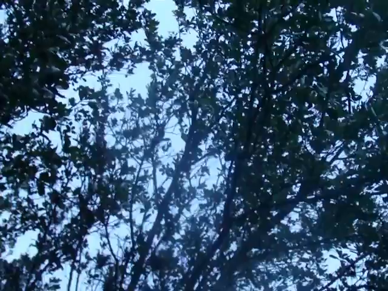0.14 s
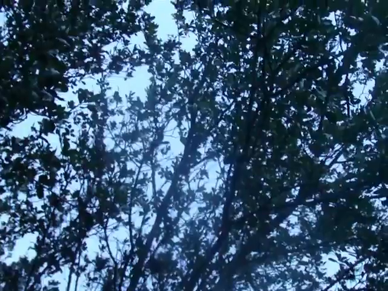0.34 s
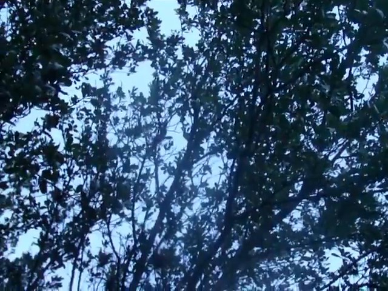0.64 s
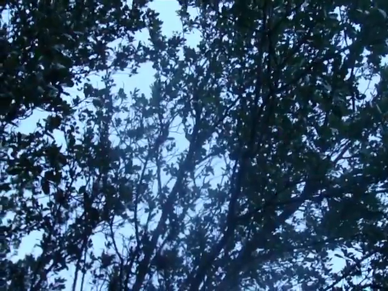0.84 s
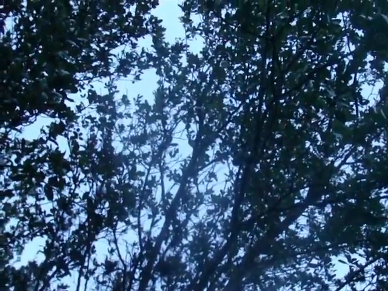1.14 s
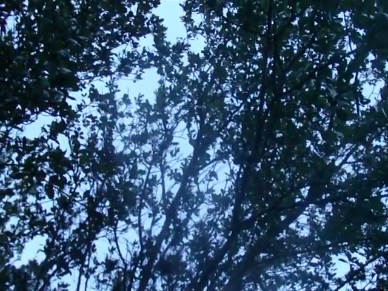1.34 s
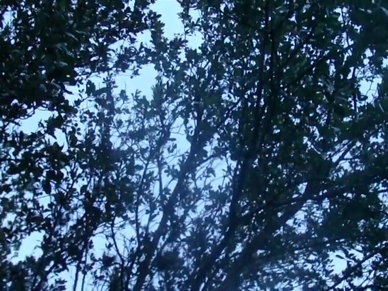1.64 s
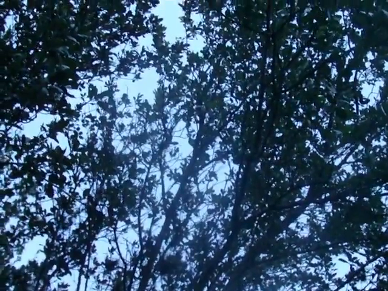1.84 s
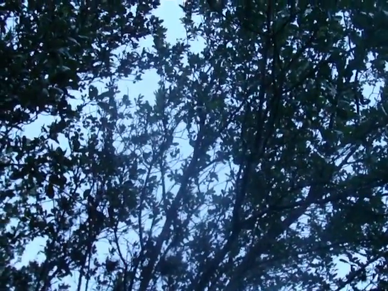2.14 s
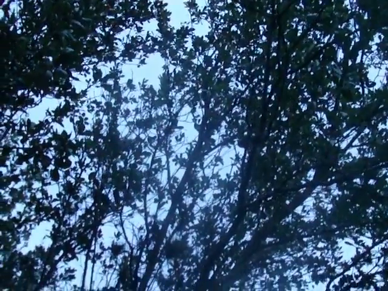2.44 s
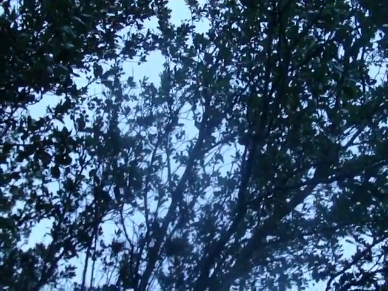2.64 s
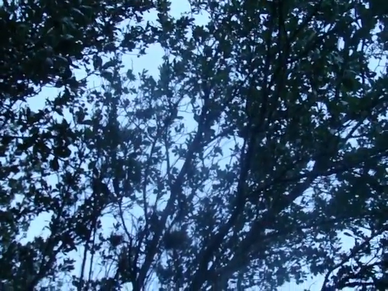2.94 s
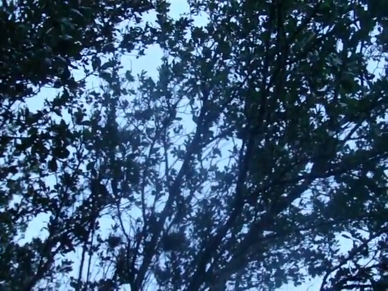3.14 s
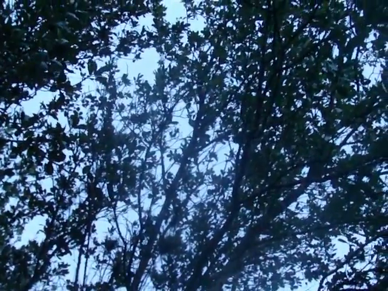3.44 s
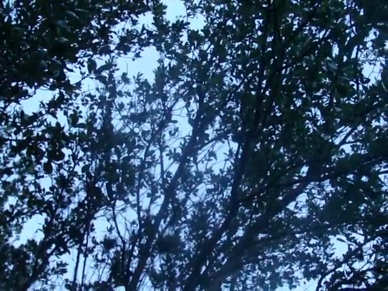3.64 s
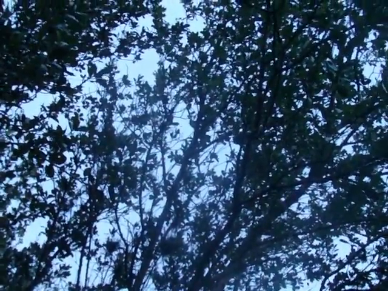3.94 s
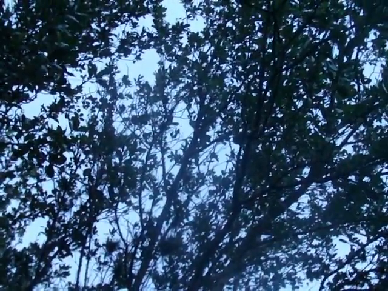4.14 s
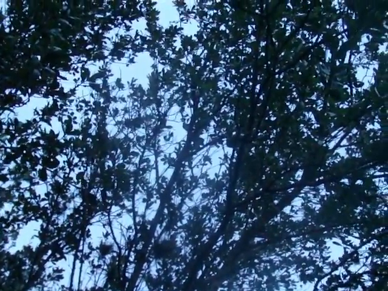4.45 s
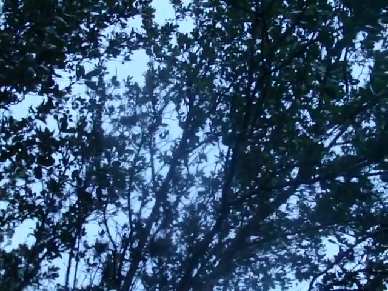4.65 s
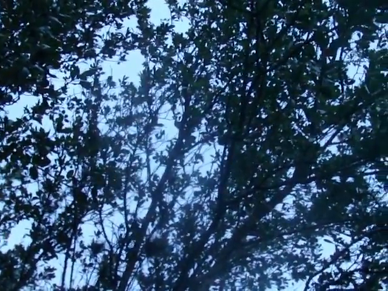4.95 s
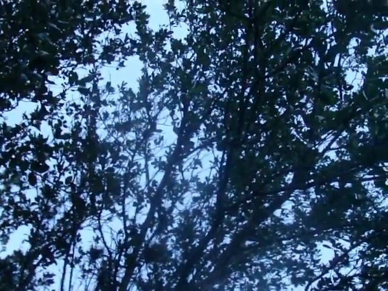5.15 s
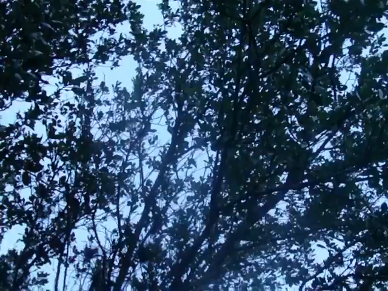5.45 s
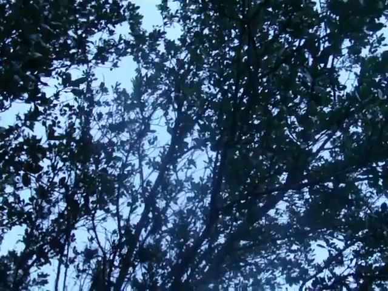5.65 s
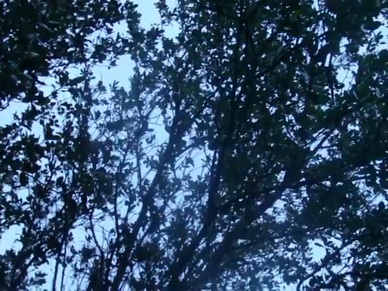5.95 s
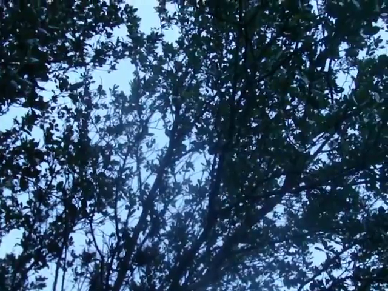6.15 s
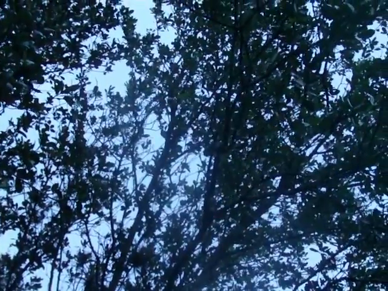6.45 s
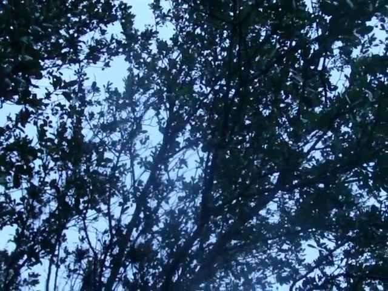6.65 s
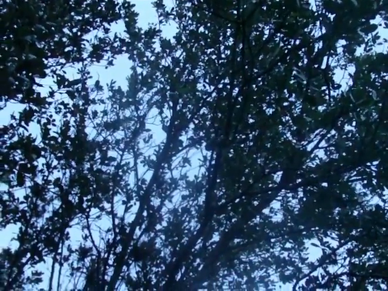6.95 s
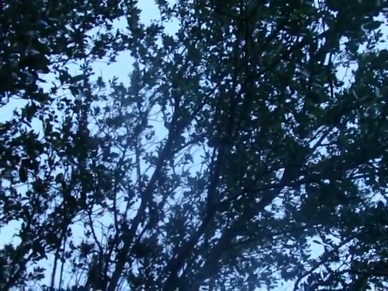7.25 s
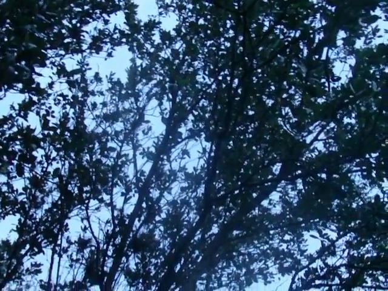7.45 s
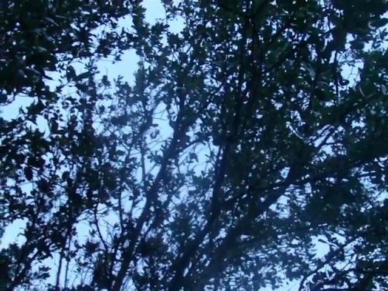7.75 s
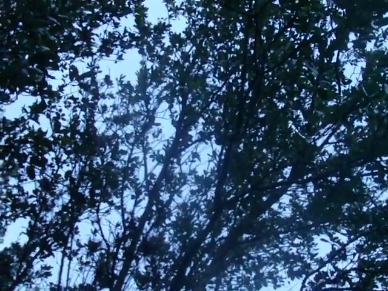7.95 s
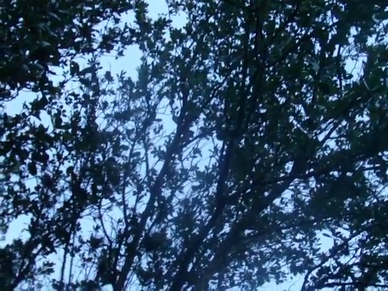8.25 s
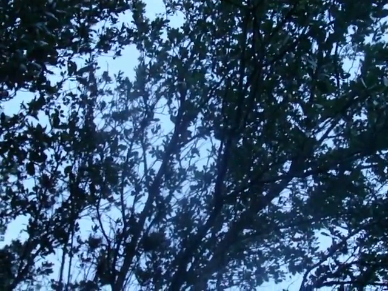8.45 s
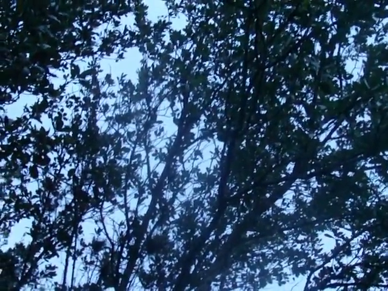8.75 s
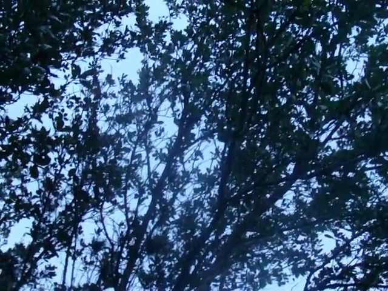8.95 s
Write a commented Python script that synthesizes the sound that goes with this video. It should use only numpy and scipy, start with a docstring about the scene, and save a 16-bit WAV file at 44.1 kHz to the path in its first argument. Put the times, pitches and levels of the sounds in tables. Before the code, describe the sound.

From 0 to about 9 seconds a single cicada sings loudly and without stopping in a tree. Its voice is a harsh, dry, metallic buzz made of some two hundred tiny falling clicks a second, strongest around 3 to 5 kHz, with a hollow wavering note near 3 kHz. Roughly six times a second it catches for a hundredth of a second, giving a quick, slightly uneven pulsing; leaves and the grove blur these gaps with a short airy tail. Above it, distant insects sustain a thin shrill hiss around 8 to 9 kHz, with fainter overtones; from about 2.6 seconds it grows a little stronger as a fast blurred clicking joins, then slowly fades. Far beneath, a vehicle approaches on a road, its hum, rumble and soft tyre hiss fullest around 5 to 6 seconds, then recedes with slightly lowering pitch. Faint steady low outdoor noise continues throughout, in mono.

```python
"""A cicada drones in a tree: its two tymbals buckle in turn, each stroke a falling chirp of a few milliseconds,
over a sustained abdomen note, with a brief catch about six times a second. Leaves scatter the song.
Further off, higher-pitched insects shrill as filtered noise and a blurred click train, and a motor vehicle
passes faintly on a road: engine harmonics, rumble and tyre hiss. Steady coloured noise lies behind it all."""
import sys
import numpy as np
from scipy import signal
from scipy.fft import rfft, irfft, next_fast_len
from scipy.io import wavfile
from scipy.ndimage import uniform_filter1d

SR = 44100
rng = np.random.default_rng(int(sys.argv[2]) if len(sys.argv) > 2 else 0)


def unload_audio(sound):
    """Save the sound as a 16-bit wav file, at the path given as the first command line argument."""
    columns = np.transpose(np.atleast_2d(sound))
    # keep every value between -1 and 1, then stretch to whole-number steps
    steps = np.round(np.clip(columns, -1, 1) * 32767)
    wavfile.write(sys.argv[1], SR, steps.astype(np.int16))


N = 401310
TIME = np.arange(N) / SR  # s


def undb(db):
    """Decibels to gain."""
    return 10 ** (np.asarray(db) / 20)


def unit(x):
    """Scale to rms 1."""
    return x / np.sqrt(np.mean(x ** 2))


def curves(table):
    """Each column of a (time [s], ..) table, drawn as straight lines over every sample."""
    s, *columns = np.transpose(table)
    return [np.interp(TIME, s, column) for column in columns]


def walk(rate):
    """Smooth random drift with about `rate` turns a second and rms 1."""
    hold = max(int(SR / rate), 1)
    steps = np.repeat(rng.standard_normal(N // hold + 1), hold)
    return unit(uniform_filter1d(steps, hold)[:N])


def colour(x, points):
    """Filter by a (frequency [Hz], level [dB]) outline, to rms 1."""
    hz, db = np.transpose(points)
    size = next_fast_len(N + 4096)
    f = np.maximum(np.fft.rfftfreq(size, 1 / SR), 1)
    octaves_outside = np.abs(np.log2(f / np.clip(f, hz[0], hz[-1])))
    outline_db = np.interp(np.log(f), np.log(hz), db) - 24 * octaves_outside
    return unit(irfft(rfft(x, size) * undb(outline_db), size)[:N])


def resonate(x, hz, width_hz):
    """One resonance, gain 1 at its centre."""
    return signal.lfilter(*signal.iirpeak(hz, hz / width_hz, fs=SR), x)


def scatter(x, t60):
    """Countless small echoes as a noise tail that falls 60 dB in t60 seconds; rms 1."""
    t = TIME[:SR // 2]
    echoes = rng.standard_normal(len(t)) * np.exp(-np.log(1000) * t / t60)
    return unit(signal.fftconvolve(x, echoes)[:N])


# spectrum of the steady far-off background: (frequency [Hz], relative level [dB])
AIR_SPECTRUM = [(30, 16), (120, 5), (300, 1), (500, -6), (1000, -10), (2000, -9)]


def far_background(level_db=-49):
    """Steady noise, weighted to the lows."""
    return colour(rng.standard_normal(N), AIR_SPECTRUM) * undb(level_db)


# low drone and exhaust harmonics, as loud as at the road's distance:
# (multiple of the cycle rate [1], level ahead [dB], level beside [dB], level behind [dB])
ENGINE_HARMONICS = [(3.11, -35, -34, -44.5), (5, -28.5, -35, -31.5), (10, -31, -48, -28),
                    (12, -46, -42.5, -46), (15, -48.5, -42, -55), (20, -61, -60, -45)]
# spectra of the road rumble and the tyre hiss: (frequency [Hz], relative level [dB])
RUMBLE_SPECTRUM = [(15, -2), (35, -4), (60, -1), (120, 0.5), (220, -4), (320, -11), (500, -21), (900, -33)]
TYRE_SPECTRUM = [(250, -16.5), (550, -10.5), (850, 0), (1200, 0), (1800, -5.5), (2600, -6), (6000, -37.5)]
# swell of the tyre hiss, before its trim and flutter: (time [s], level [dB])
TYRE_SWELL = [(0.0, -46), (0.05, -49), (0.99, -48), (1.39, -49.5), (2.28, -45.5), (2.84, -42), (4.31, -44),
              (5.12, -38.5), (8.01, -44), (8.49, -41), (8.85, -44), (9.1, -43.5)]
# the pass: when it is nearest, its speed, how far off the road is, its engine's cycle rate
NEAREST_S, SPEED_M_S, ROAD_M, CYCLE_HZ = 5.76, 31.7, 49.2, 16.42
SOUND_M_S = 343
# trees in between dull the engine: loss per metre beyond the road's distance and per Hz
TREES_DB_PER_M_HZ = .0003


def vehicle(rumble_db=-35, tyres_trim_db=1.5, waver_db=1.13):
    """Engine harmonics swell and, by Doppler shift, sink in pitch as it passes, over rumble and tyre hiss."""
    along = SPEED_M_S * (TIME - NEAREST_S)
    distance = np.hypot(along, ROAD_M)
    away = along / distance  # -1 coming, 0 abreast, 1 going
    hz = CYCLE_HZ / (1 + away * SPEED_M_S / SOUND_M_S)
    phase = 2 * np.pi * np.cumsum(hz * (1 + 0.002 * walk(15))) / SR
    loss_db = TREES_DB_PER_M_HZ * (distance - ROAD_M) * hz
    engine = np.zeros(N)
    for multiple, *heard_db in ENGINE_HARMONICS:
        tone_db = np.interp(away, [-1, 0, 1], heard_db) - multiple * loss_db + waver_db * walk(4.9)
        engine += np.sqrt(2) * np.sin(multiple * phase) * undb(tone_db)
    rumble = colour(rng.standard_normal(N), RUMBLE_SPECTRUM) * undb(rumble_db)
    hiss_db, = curves(TYRE_SWELL)
    tyres = colour(rng.standard_normal(N), TYRE_SPECTRUM) * undb(hiss_db + tyres_trim_db + 0.53 * walk(8))
    return (engine + rumble) * ROAD_M / distance + tyres


# main resonance and overtone band of the higher-pitched insects: (frequency [Hz], relative level [dB])
SHRILL_SPECTRUM = [(5500, -10), (6800, -17.5), (7600, -15.5), (8100, -2), (8600, -0.5), (9200, 1),
                   (9800, -8), (10600, -17), (12000, -24)]
OVERTONE_SPECTRUM = [(8500, -9), (10500, -3.5), (11300, -3), (12000, 0.5), (13500, 0.5), (14200, -9),
                     (15000, -20.5)]
# their swell, the overtones before a trim: (time [s], main band level [dB], overtone band level [dB])
SHRILL_SWELL = [(0.0, -24, -34.5), (0.35, -25.5, -37), (0.73, -26, -35.5), (1.77, -26.5, -36),
                (1.9, -26, -35), (3.06, -22, -34), (4.36, -22.5, -33), (8.72, -24, -34), (9.1, -25, -34)]
# the clicking insect swells up to its peak, then slowly fades; peak level against the chorus
CLICKER_PEAK_S, CLICKER_DB, CLICKER_RISE_DB_PER_S, CLICKER_FADE_DB_PER_S = 2.695, -1, 38, 1.5


def shrill_insects(click_hz=368, overtone_trim_db=-2):
    """A far chorus blurred to a hiss; one nearer insect joins with a fast, wavering click train."""
    main_db, overtone_db = curves(SHRILL_SWELL)
    since = TIME - CLICKER_PEAK_S
    swell_db = np.minimum(CLICKER_RISE_DB_PER_S * since, -CLICKER_FADE_DB_PER_S * since)
    share = undb(CLICKER_DB + swell_db)
    rate = click_hz * (1 + .003 * walk(2) + .003 * walk(150))
    clicks = np.diff(np.floor(np.cumsum(rate) / SR), prepend=0)  # one click per whole cycle
    chorus = rng.standard_normal(N) * undb(0.47 * walk(250))
    # the clicker takes its share without raising the overall power
    source = (chorus + share * scatter(clicks, t60=0.025)) / np.hypot(1, share)
    main = colour(source, SHRILL_SPECTRUM) * undb(main_db)
    overtones = colour(source, OVERTONE_SPECTRUM) * undb(overtone_db + overtone_trim_db)
    return main + overtones


# pace of the song, in runs of even phrases: (time of the catch opening the run [s], phrases in the run [count])
PHRASE_RUNS = [(0.1064, 3), (0.552, 7), (1.6491, 2), (1.9533, 2), (2.2697, 1), (2.4196, 11), (4.165, 2),
               (4.492, 1), (4.6383, 9), (6.1185, 3), (6.5909, 3), (7.0819, 4), (7.7624, 2), (8.089, 3),
               (8.5933, 3), (9.0786, 1)]
# a catch lasts a little longer as the song goes on; spread as a share of its length
CATCH_S, CATCH_GROWTH_S_PER_S, CATCH_SPREAD = .0109, .0002, .1


def catches():
    """Start and end (s) of each brief catch between two phrases."""
    opens, phrases = np.transpose(PHRASE_RUNS)
    first_number = np.cumsum(phrases) - phrases
    middle = np.interp(np.arange(first_number[-1] + 1), first_number, opens)
    length = CATCH_S + CATCH_GROWTH_S_PER_S * middle
    length = length * (1 + CATCH_SPREAD * rng.standard_normal(len(middle)))
    return middle - length / 2, middle + length / 2


# stroke spacing after a catch, before each phrase is stretched to fit: (time since the catch [s], spacing [s])
STROKE_SPACING = [(0, 0.0044), (.012, 0.00492), (.019, .0051), (.04, .0047), (.1, .00455), (.15, .0041)]


def stroke_times(limp=.025, jitter=.014, last_stroke_s=.0029):
    """Rows (s, tymbal 0 or 1, strokes to the nearer end of the phrase): left and right alternate unevenly."""
    pause, resume = catches()
    starts = np.append(-.04, resume)
    ends = np.append(pause, TIME[-1] + .1)
    rows = []
    for start, end in zip(starts, ends):
        chance = rng.standard_normal(64)
        span = end - start - last_stroke_s
        t = [0.]
        while t[-1] < span:
            k = len(t)
            spacing = np.interp(t[-1], *np.transpose(STROKE_SPACING))
            t.append(t[-1] + spacing * (1 + limp * (-1) ** k + jitter * chance[k % len(chance)]))
        # stretch the phrase so that its last stroke lands on the span
        last = np.argmin(np.abs(np.array(t) - span))
        rows += [(start + t[k] * span / t[last], k % 2, min(k, last - k)) for k in range(last + 1)]
    return np.array(rows)


# one stroke, the ribs buckling from stiff to slack in two bursts, before each stroke's own variation:
# (time in the stroke [s], pitch [Hz], level [dB])
STROKE_SHAPE = [(0, 5600, -23), (.00026, 5330, 1.5), (.00075, 4980, 4), (.0013, 4700, -6.5),
                (.0019, 4370, 2), (.0028, 4090, 0.5), (.0034, 3700, -9), (.004, 3250, -10.5),
                (.0052, 2960, -19), (.007, 2960, -66)]


def tymbals(rib_hz=1250, rib_depth=0.5, pitch_spread=0.022, side_detune=0.013, size_db=.4, rasp=0.14, edge_db=-2):
    """Every stroke is a falling chirp that flutters as rib after rib gives way; those beside a catch are weaker."""
    start, side, from_edge = stroke_times().T[:, :, None]
    pitch_chance, rib_chance, phase_chance, size_chance = rng.standard_normal((4, len(start), 1))
    at, pitch_hz, stroke_db = np.transpose(STROKE_SHAPE)
    t = TIME[:int(at[-1] * SR)]
    hz = np.interp(t, at, pitch_hz) * (1 + pitch_spread * pitch_chance + side_detune * (side - .5))
    rib_phase = 2 * np.pi * rib_hz * t * (1 + 0.09 * rib_chance) + np.pi * side + phase_chance
    ribs = 1 + rib_depth * np.cos(rib_phase)
    chirp = np.sin(2 * np.pi * np.cumsum(hz, axis=1) / SR)
    wave = chirp + rasp * rng.standard_normal(hz.shape)
    level_db = np.interp(t, at, stroke_db) + size_db * size_chance + edge_db * (from_edge == 0)
    strokes = wave * ribs * undb(level_db)
    # lay all strokes on the timeline, summing where they overlap
    index = (start * SR).astype(int) + np.arange(len(t))
    inside = (index >= 0) & (index < N)
    return np.bincount(index[inside], strokes[inside], N)


def abdomen_note(strokes, note_hz=3053, waver=.017, waver_hz=90, follow_s=0.00469, level_db=-13.5):
    """The strokes keep the hollow abdomen singing on one wavering note, which stops in each catch."""
    drive = uniform_filter1d(np.abs(strokes), max(int(follow_s * SR), 1))
    hz = note_hz * (1 + waver * walk(waver_hz))
    note = drive * np.sin(2 * np.pi * np.cumsum(hz) / SR)
    return unit(note) * undb(level_db)  # against the radiated strokes


# resonances and hollows of the abdomen and tymbal covers: (frequency [Hz], width [Hz], boost [dB])
BODY_RESONANCES = [(3032, 89, 7.5), (3640, 46.3, 8), (3920, 31, 3), (4129, 47, 6), (4244, 33, 3),
                   (4333, 39, 2.5), (4540, 49, -8), (4590, 25.6, 2), (4774, 50, -8), (4903, 38, 4.5),
                   (5130, 26, 7), (5870, 35, 0.5), (6100, 29, 5)]
# how well the body radiates: (frequency [Hz], relative level [dB])
BODY_RADIATION = [(1500, -41), (2200, -12.5), (2700, -3.5), (2950, 1), (3400, -3.5), (3750, -3),
                  (4200, -0.5), (4800, -1.5), (5400, -2), (6100, -4.5), (6600, -8), (8000, 4.5),
                  (12000, -14)]


def cicada(leaves_db=-12, grove_db=-12, song_db=-14):
    """The strokes ring the body; near leaves smear them and the grove behind fills the catches."""
    body = strokes = tymbals()
    for hz, width_hz, boost_db in BODY_RESONANCES:
        body = body + (undb(boost_db) - 1) * resonate(body, hz, width_hz)
    song = colour(body, BODY_RADIATION) + abdomen_note(strokes)
    leaves = undb(leaves_db) * scatter(song, t60=0.067)
    grove = undb(grove_db) * scatter(song, t60=0.89)
    return unit(song + leaves + grove) * undb(song_db)


def scene():
    """All sources at one microphone."""
    return (far_background() + vehicle() + shrill_insects() + cicada())[None]


def record(dry, top_hz=15150):
    """The recorder cuts the top with a steep low-pass."""
    low_pass = signal.ellip(10, .2, 80, top_hz, fs=SR, output="sos")
    return signal.sosfilt(low_pass, dry)


dry = scene()
out = record(dry)
unload_audio(out)
```